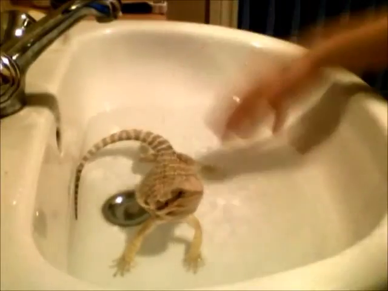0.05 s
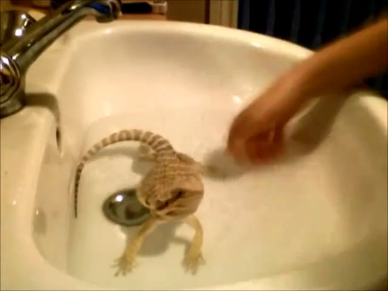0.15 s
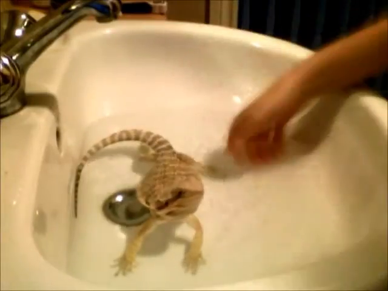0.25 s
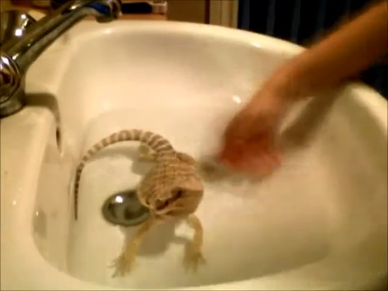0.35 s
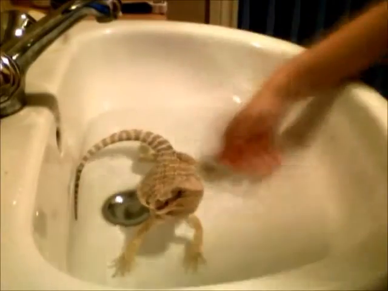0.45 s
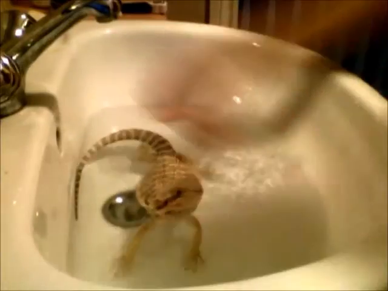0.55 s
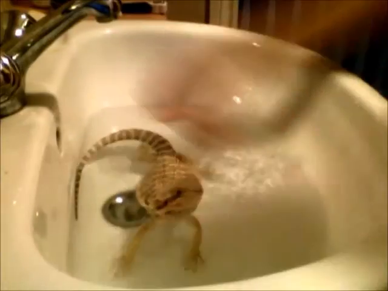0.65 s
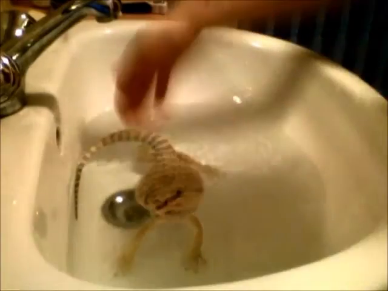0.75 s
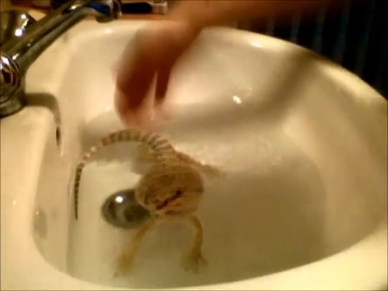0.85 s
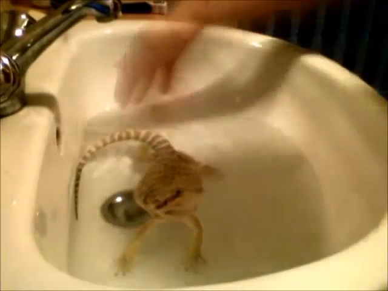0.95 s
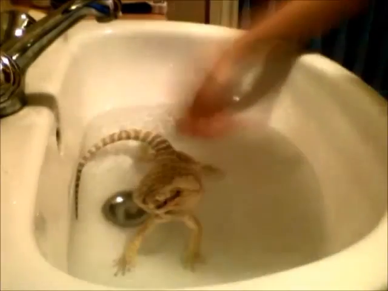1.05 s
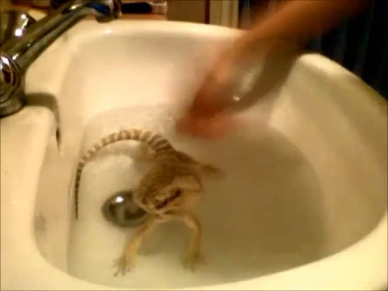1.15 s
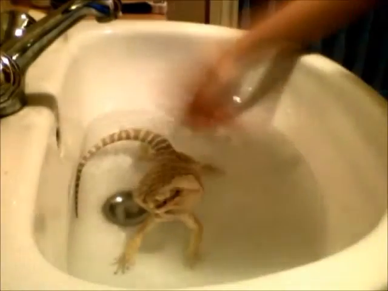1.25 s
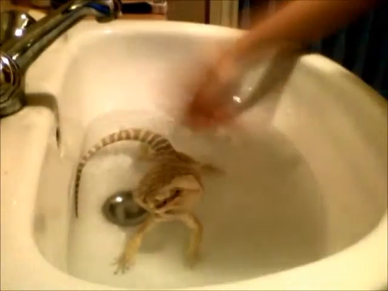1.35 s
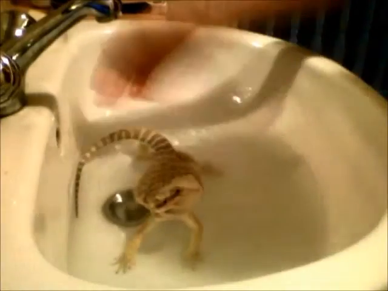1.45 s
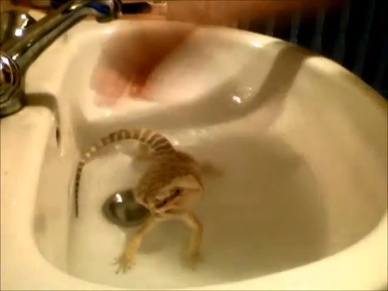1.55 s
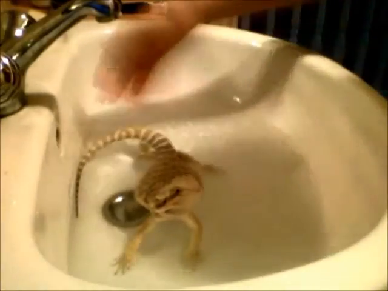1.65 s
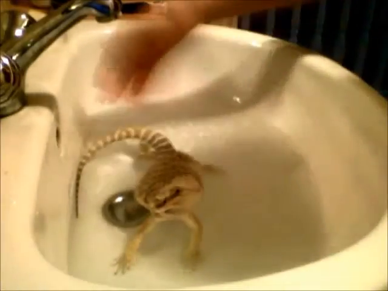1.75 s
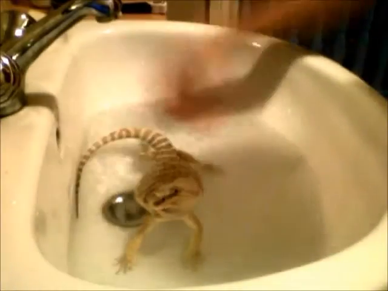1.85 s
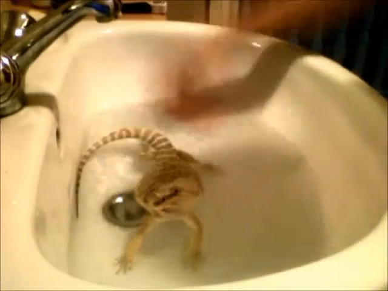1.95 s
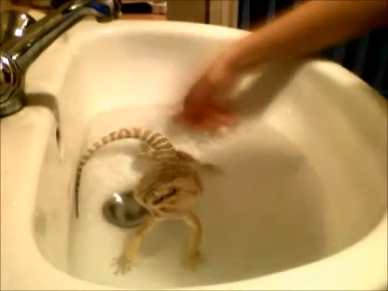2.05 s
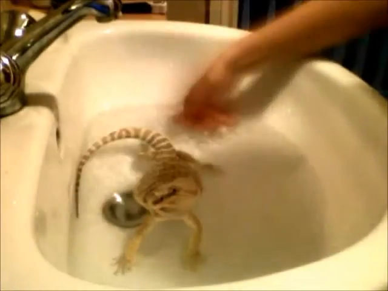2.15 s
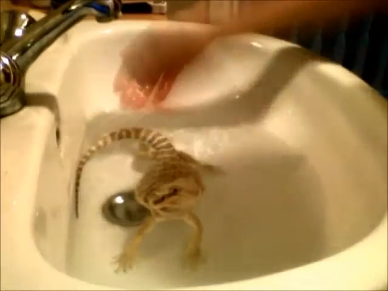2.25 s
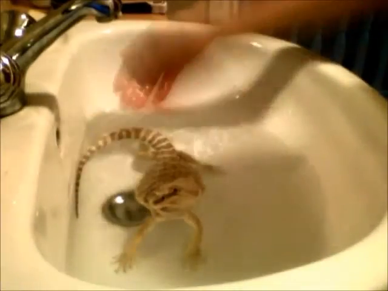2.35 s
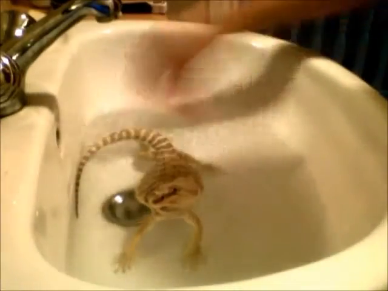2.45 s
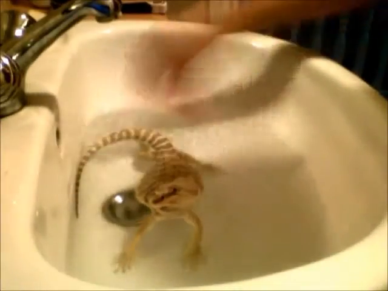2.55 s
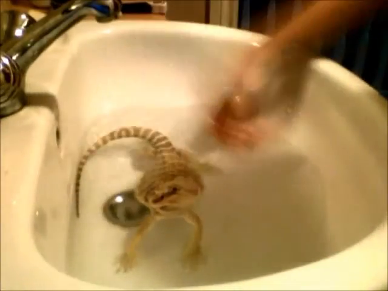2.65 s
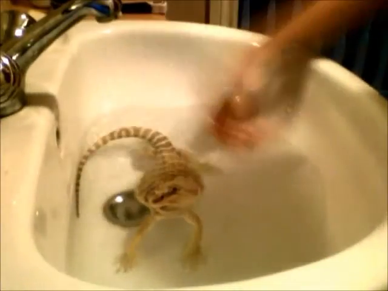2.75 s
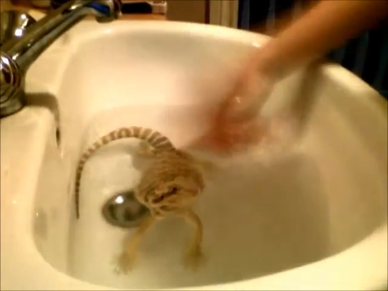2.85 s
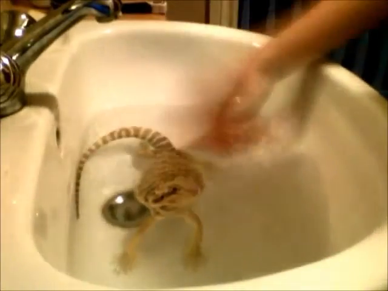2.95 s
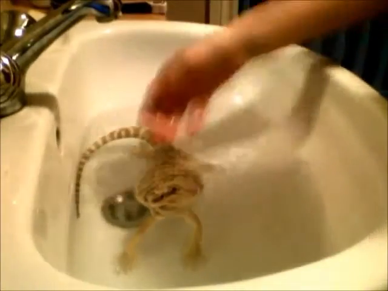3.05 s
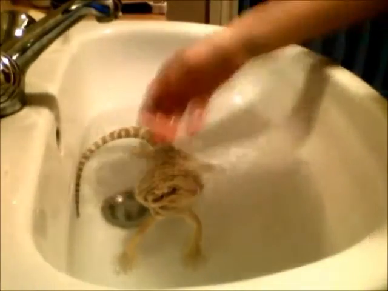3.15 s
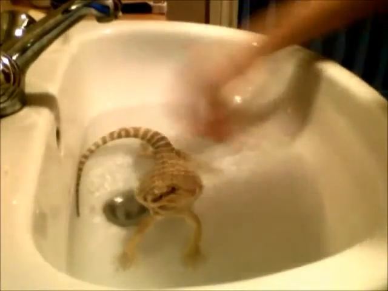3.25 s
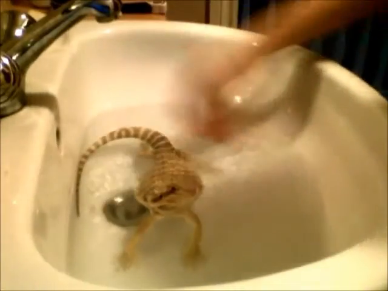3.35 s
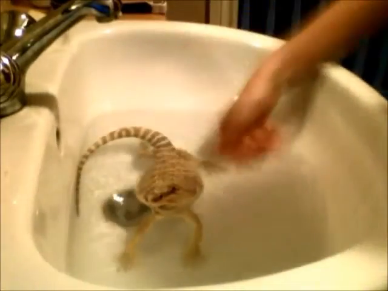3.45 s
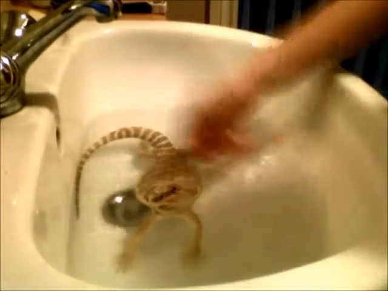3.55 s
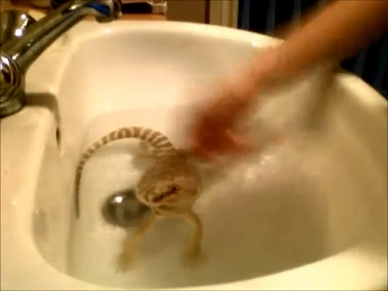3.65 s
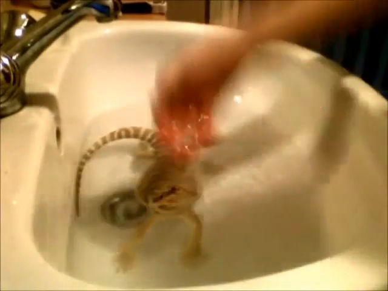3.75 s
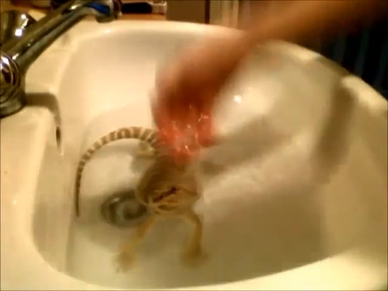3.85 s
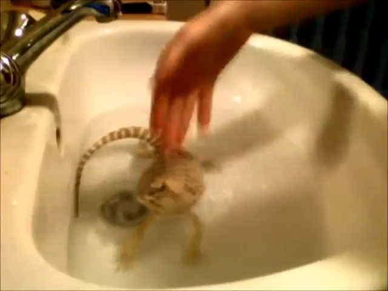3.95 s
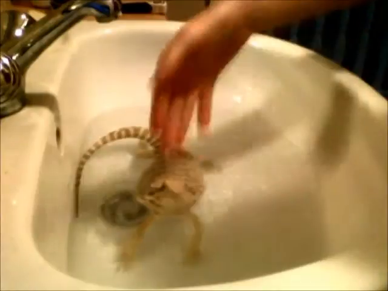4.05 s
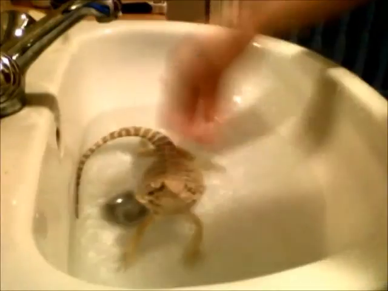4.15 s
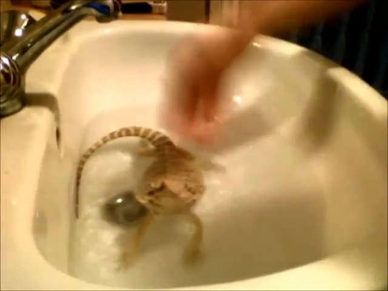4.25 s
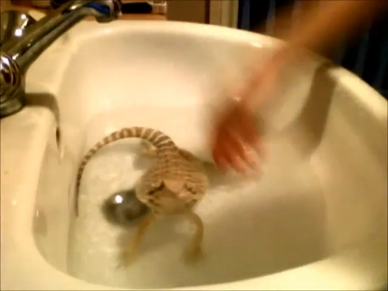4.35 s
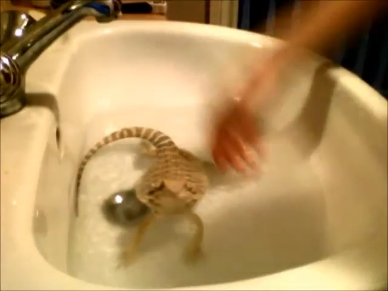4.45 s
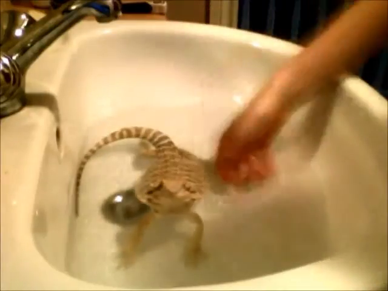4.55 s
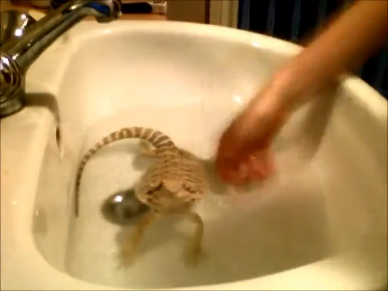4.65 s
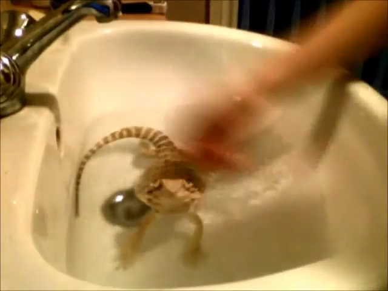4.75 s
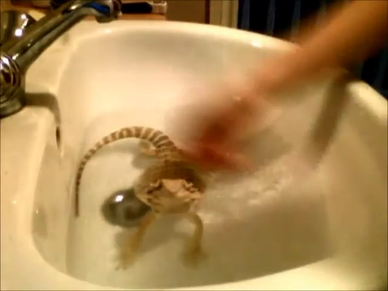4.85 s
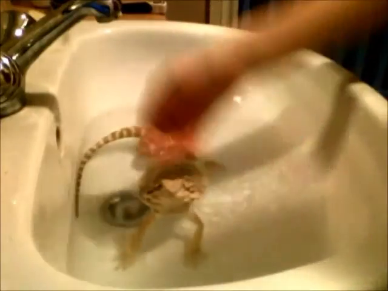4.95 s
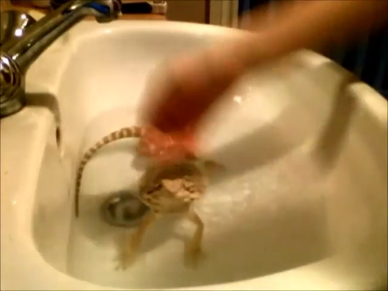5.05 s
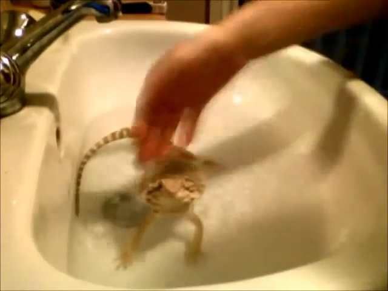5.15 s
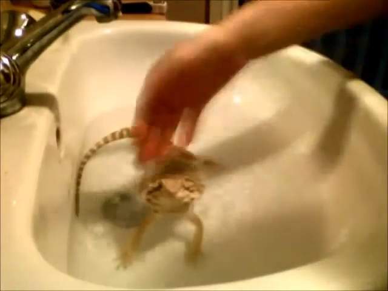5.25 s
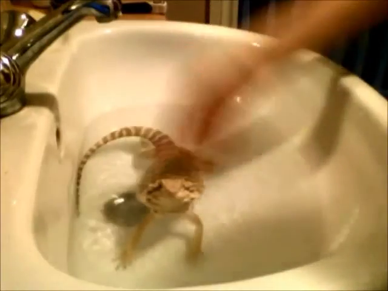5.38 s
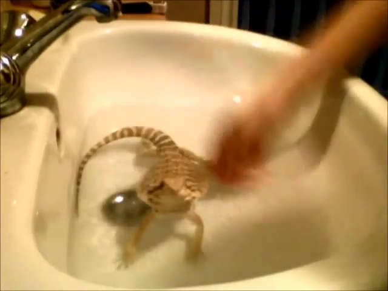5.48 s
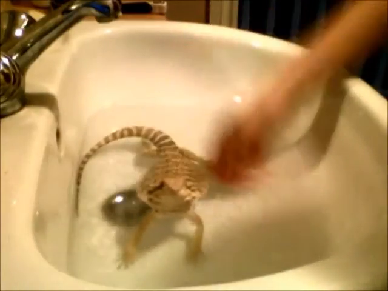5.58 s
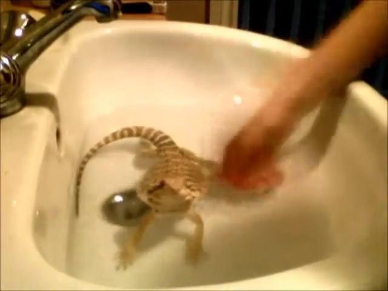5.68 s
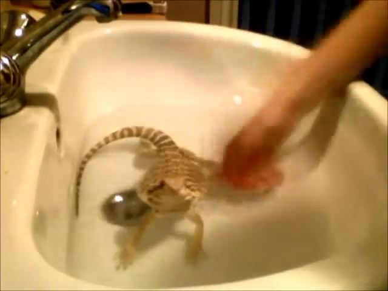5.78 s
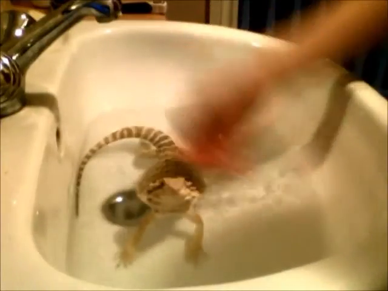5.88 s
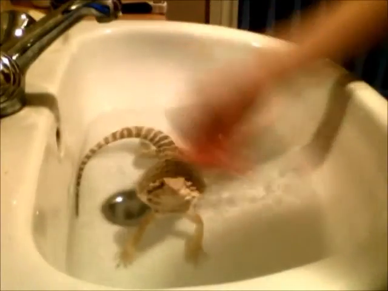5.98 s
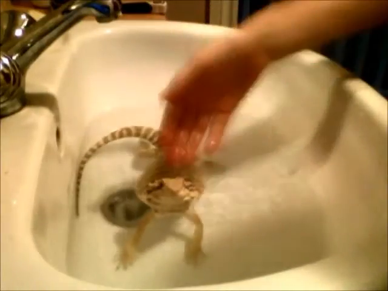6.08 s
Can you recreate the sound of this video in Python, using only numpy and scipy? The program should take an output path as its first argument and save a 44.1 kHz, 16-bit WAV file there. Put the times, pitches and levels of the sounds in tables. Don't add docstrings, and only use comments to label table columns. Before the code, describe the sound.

A constant mid-low fan drone with airy draught underlies everything. A muffled knock opens, followed by light drips and little water movements; a few low bumps come before two seconds, then a calmer stretch of plinks. A bright, loud drip leads into repeated deep thumps with short sloshes until the end. Close, lo-fi camera microphone on the counter, with short tiled-room reverberation and faint metallic high-frequency artifacts.

```python
import sys
import numpy as np
from scipy import signal
from scipy.fft import rfft, irfft, next_fast_len
from scipy.io import wavfile
from scipy.ndimage import uniform_filter1d

SR = 44100
rng = np.random.default_rng(int(sys.argv[2]) if len(sys.argv) > 2 else 0)


def persist_wave(psi):
    counts = np.round(np.clip(psi, -1, 1) * 32767).astype(np.int16)
    wavfile.write(sys.argv[1], SR, np.atleast_2d(counts).T)


def invert_db(x):
    u = np.asarray(x, float) / 20
    return 10 ** u


N = 269892

# t/s, f/Hz
FAN_SPEED = [(0.0, 535.9), (0.05, 533.2), (2.25, 530.6), (3.54, 535.3), (4.75, 535.2), (6.07, 529.6),
             (6.12, 526.7)]
# multiple of the shaft rate, level/dB
FAN_ORDERS = [(0.5, -10), (1, -13.5), (1.5, -19), (2, -16), (2.5, -18.5), (3, -7.5), (3.5, -17), (4, -2.5),
              (4.5, -38), (5, -37), (5.5, -32), (6, -11), (6.5, -28), (7, -15.5), (7.5, -28), (8, -12.5),
              (8.5, -22.5), (9, -6), (9.5, -37), (10, -15), (10.5, -26), (11, -24), (11.5, -28.5),
              (12, -26), (12.5, -25.5), (13, -20.5), (13.5, -30.5), (14, -31.5)]
# f/Hz, level/dB
MAINS_HUM = [(120, -49.5)]
# f/Hz, density/dB per Hz
DRAUGHT = [(15, -12.5), (45, -8), (72, -1), (105, -8), (150, -13), (220, -9.5), (330, -16.5), (700, -14),
           (1500, -16.5), (2300, -23), (2700, -25.5), (3200, -31.5), (4000, -41)]
# t/s, gain/dB
HAND_SWELLS = [(0.1, 4.5), (0.54, 3.5), (1.7, 5), (4.365, 8.5), (5.225, 7), (5.47, 7.5), (5.77, 9)]
# t/s, level/dB
LAPPING_LEVEL = [(0.0, -60.5), (0.83, -64.5), (1.21, -65.5), (1.7, -65), (3.83, -63.5), (4.33, -63.5),
                 (4.94, -61), (5.13, -67.5), (5.79, -61), (6.12, -62.5)]
# f/Hz, width/Hz, level/dB
BOWL_MODES = [(1700, 180, 0.0016), (2050, 190, 0.0031), (2650, 180, 0.0032)]
# f/Hz, t60/s
TILE_DECAY = [(200, 0.68), (2000, 0.58), (5000, 0.35)]
# f/Hz, width/Hz, level/dB
COUNTER_MODES = [(106.2, 24, -4), (146.5, 25.5, 4)]
# f/Hz, width/Hz, level/dB
CABINET_MODES = [(200.6, 16.9, -5), (273.4, 37.2, 1), (356.3, 36.8, -2), (431, 61, -1.5)]
# t/s, sway level/dB, drum level/dB, rattle level/dB, sway f/Hz
BLOW_EVENTS = [(0.043, -35, -17, -37, 39), (1.28, -20, -34.5, -47.5, 23.1), (1.856, -33, -36, -50, 27.3),
               (3.675, -24.5, -37, -43, 26.6), (4.184, -13, -13, -26, 56), (4.602, -18, -25.5, -35, 43.9),
               (5.096, -18, -16.5, -31, 24.8), (5.67, -12.5, -33, -41, 32.3)]
# t/s, sway level/dB, drum level/dB, rattle level/dB, sway f/Hz
REBOUND_EVENTS = [(0.075, -39, -33, -47.5, 36.2), (0.115, -35, -34, -50, 33.8),
                  (1.327, -30, -37, -58, 39.5), (1.345, -28.5, -46, -50, 36),
                  (1.398, -30.5, -43.5, -57, 40.4), (1.481, -38, -59, -56, 27),
                  (3.712, -29, -37.5, -58, 29.8), (3.751, -42, -45, -55, 37),
                  (4.215, -26.5, -23.5, -34, 42.4), (4.232, -11.5, -35, -45.5, 48),
                  (4.284, -22.5, -37, -53, 49), (4.432, -35.5, -53, -54, 29.1),
                  (4.644, -31, -30.5, -40, 24.3), (4.672, -20.5, -37, -41, 24.8),
                  (5.135, -24, -36, -34.5, 38.8), (5.18, -25.5, -28, -44.5, 29),
                  (5.228, -37.5, -42, -54, 40), (5.733, -26.5, -31, -36.5, 28),
                  (5.788, -24, -36, -42.5, 29.4), (5.859, -33, -42.5, -61, 21.6)]
# t/s, level/dB
BRUSH_EVENTS = [(0.6, -48), (0.791, -44.5), (1.115, -48), (1.262, -43), (5.07, -43), (1.818, -45.5),
                (2.1, -54.5), (2.399, -55), (2.669, -54), (3.269, -52), (4.35, -49)]
# t/s, peak level/dB, pitch f/Hz
DROP_EVENTS = [(0.17, -51.5, 1932), (3.15, -54, 2230), (0.496, -57.5, 3380), (0.559, -49, 1700),
               (0.693, -53, 2675), (0.699, -57.5, 3230), (0.74, -57.5, 3030), (0.54, -62, 3540),
               (0.918, -53.5, 1700), (1.2, -52.5, 2050), (2.075, -54.5, 2660), (3.882, -36.5, 1980),
               (2.321, -55.5, 2850), (2.74, -45.5, 2650), (2.949, -56, 2560), (3.146, -50.5, 2048),
               (3.881, -41.5, 2303), (3.881, -29, 1872), (4.931, -59.5, 2590), (4.976, -51, 2650),
               (5.011, -46.5, 2030), (5.061, -53.5, 2050), (5.163, -54, 1700), (5.349, -54.5, 2815),
               (5.665, -46, 2050), (5.689, -56.5, 3110), (5.69, -47, 2650), (5.735, -46, 2700),
               (5.744, -50, 2140), (5.96, -53.5, 1670)]
# t/s, level/dB, length/s, centre f/Hz
SLOSHES = [(0.683, -66, 0.042, 2890), (1.82, -59.5, 0.057, 600), (2.327, -60.5, .12, 300),
           (4.194, -52.5, 0.061, 534), (3.89, -68, 0.069, 913), (4.615, -58, 0.089, 520),
           (5.109, -53, 0.046, 405), (5.202, -63, .05, 960), (5.302, -68.5, 0.074, 2760),
           (5.669, -64, 0.16, 2400), (5.777, -55, .05, 705),
           (1.105, -52.5, .068, 450),
    (1.112, -54, .068, 1050),
    (5.662, -51, .05, 850),
    (5.725, -52, .1, 550),
    (5.67, -61, .12, 1600),
]
# f/Hz, level/dB
FOLD_IMAGE = [(3900, 0.5), (4650, -13.5), (5500, -42), (6100, -50.5), (7000, -50), (8000, -65), (9000, -81)]
# f/Hz, level/dB
MIRROR_CARRIERS = [(3900, -51), (7800, -65), (11700, -75.5), (11900, -82.5), (15600, -85.5), (15870, -83)]
# f/Hz, density/dB per Hz
CHANNEL_NOISE = [(300, -4), (900, -1), (2500, 0.5), (3500, -8), (4500, -20.5), (5200, -29.5)]
# f/Hz, gain
BASS_LEAN = [(200, -.03), (600, -.012)]


def unit(x):
    return x / np.sqrt(np.mean(x ** 2) + 1e-20)


def along(points, hz):
    f, v = np.transpose(points)
    return np.interp(np.log(hz + 1), np.log(f + 1), v)


def curve(points):
    s, v = np.transpose(points)
    return np.interp(np.arange(N) / SR, s, v)


def wobble(rate):
    return np.interp(np.arange(N) * rate / SR, np.arange(400), rng.standard_normal(400))


def filtered(x, response):
    n = x.shape[-1]
    m = next_fast_len(n + SR // 4)
    return irfft(rfft(x, m) * response(np.fft.rfftfreq(m, 1 / SR)), m)[..., :n]


def modes(table, top_hz):
    def response(f):
        total = 0
        for k, (centre, width, db) in enumerate(table):
            total = total + (-1) ** k * invert_db(db) * 1j * f / (centre * centre - f * f + 1j * f * width)
        return total / (1 + 1j * f / top_hz) ** 3
    return response


def sixth_db():
    t = np.arange(N) / SR
    swells = sum(db * np.exp(-((t - s) / 0.046) ** 2 / 2) for s, db in HAND_SWELLS)
    return -61 + 2.76 * wobble(11) + swells


def fan():
    shaft_phase = 2 * np.pi * np.cumsum(curve(FAN_SPEED) / 4) / SR
    drone, hum = np.zeros(N), np.zeros(N)
    for k, db in FAN_ORDERS:
        level = sixth_db() if k == 6 else db - 54.5 + wobble(8.3)
        phase = k * shaft_phase + rng.uniform(0, 6.55) + 0.15 * wobble(18)
        drone += np.sqrt(2) * invert_db(level) * np.sin(phase)
    for hz, db in MAINS_HUM:
        hum += np.sqrt(2) * invert_db(db + 0.1 * wobble(14)) * np.sin(2 * np.pi * hz * np.arange(N) / SR)

    z = signal.stft(rng.standard_normal(N), nperseg=512)[2]
    patches = uniform_filter1d(uniform_filter1d(rng.standard_normal(z.shape), 5, 0), 10, 1)
    gusts = signal.istft(z * invert_db(1.4 * unit(patches)), nperseg=512)[1][:N]
    draught = filtered(gusts, lambda hz: invert_db(along(DRAUGHT, hz)))

    tremble = filtered(rng.standard_normal(N), lambda hz: hz / (hz + 8) / (1 + (hz / 30) ** 3))
    tremble_db = -54.5 + 1.5 * wobble(1) + 3 * wobble(18)
    return drone + hum + invert_db(-57) * unit(draught) + invert_db(tremble_db) * unit(tremble)


def bubble(t, hz, cycles, rise):
    age = t * hz / cycles
    tone = np.sin(2 * np.pi * hz * t * (1 + rise * np.minimum(age, 2) / 2))
    return tone * np.exp(-age) * (1 - np.exp(-t * hz / 1.5)) ** 2


def tiled(x):
    hz, t, z = signal.stft(rng.standard_normal(SR // 2), SR, nperseg=256)
    early = 1 + 1.2 * np.exp(-(t / 0.041) ** 2)
    decay = invert_db(-60 * t / along(TILE_DECAY, hz)[:, None]) * early
    tail = signal.istft(z * decay, SR, nperseg=256)[1]
    delayed = np.pad(x, (250, 0))
    return signal.fftconvolve(delayed, tail / np.linalg.norm(tail))


def lapping(count=1200):
    draw = rng.standard_normal((count, 2))
    hz = 2100 * np.exp(.22 * np.clip(draw[:, :1], -2, 1.5))
    span = np.arange(900)
    grains = invert_db(4 * draw[:, 1:]) * bubble(span / SR, hz, 10, rise=.1)
    where = rng.integers(0, N, (count, 1)) + span
    ripples = np.bincount(where.ravel(), grains.ravel(), N + 900)[:N]
    near = filtered(ripples, modes(BOWL_MODES, top_hz=5000))
    return invert_db(curve(LAPPING_LEVEL) - 7) * unit(near + invert_db(4.5) * tiled(near)[:N])


def knocks():
    blows = [(*row, 0.032, hz) for *row, hz in BLOW_EVENTS]
    rebounds = [(*row, 0.022, hz) for *row, hz in REBOUND_EVENTS]
    brushes = [(s, db, db, db - 3.5, 0.028, 38) for s, db in BRUSH_EVENTS]
    return blows + rebounds + brushes


def thumps():
    out, t = np.zeros(N + SR), np.arange(SR // 4) / SR
    drum, rattle = modes(COUNTER_MODES, top_hz=300), modes(CABINET_MODES, top_hz=600)
    strength = np.array([[.02], [.04], [.09]])
    stretch = np.array([[1.8], [.9], [1.3]])
    for s, *peaks_db, length, sway_hz in knocks():
        shudder = np.exp(-t / (max(length, .004) * stretch))
        pushes = strength * rng.standard_normal((3, len(t))) * shudder
        pushes[[0, 1, 2], [SR // 250, 0, 0]] -= 1
        sway = modes([(.8 * sway_hz, 2.2 * sway_hz, 0)], top_hz=2.3 * sway_hz)
        bodies = [sway, lambda hz: drum(hz) ** 2, lambda hz: rattle(hz) ** 2]
        for push, body, db in zip(pushes, bodies, peaks_db):
            ring = filtered(push, body)
            out[round(s * SR):][:len(t)] += invert_db(db) * ring / np.abs(ring).max()
    return out[:N]


def drops():
    out, t = np.zeros(N + SR), np.arange(SR // 10) / SR
    for s, db, hz in DROP_EVENTS:
        cycles = max(11.9 - .1 * (db + 53.5), 3)
        plink = bubble(t, hz, 1.2 * cycles, rise=-.01)
        plink += .6 * bubble(t, 1.09 * hz, .8 * cycles, rise=-.02)
        wet = invert_db(0.5) * tiled(plink)
        wet[:len(t)] += plink
        start = round(s * SR)
        out[start:][:len(wet)] += invert_db(db - 0.9) * wet[:N + SR - start]
    return out[:N]


def swishes():
    out, t = np.zeros(N + SR), np.arange(SR // 3) / SR
    for s, db, length, centre_hz in SLOSHES:
        def band(hz):
            return np.exp(-(np.log((hz + 1) / centre_hz) / .65) ** 2) / (1 + (hz / 3300) ** 8)
        wash = filtered(rng.standard_normal(len(t)), band)
        swell = (1 - np.exp(-t / .008)) * np.exp(-(t / length) ** 4)
        out[round(s * SR):][:len(t)] += invert_db(db) * unit(wash) * swell
    return out[:N] * invert_db(1.2 * wobble(60))


def scene():
    mono = fan() + lapping() + thumps() + drops() + swishes()
    return np.array([mono, mono])


def low_pass(x):
    return signal.sosfilt(signal.butter(12, 15900, fs=SR, output="sos"), x)


def record(dry):
    t, first_rate_hz = np.arange(N) / SR, 8000
    narrow = filtered(dry[0], lambda hz: hz < first_rate_hz / 2)
    mirrored = 2 * narrow * np.cos(2 * np.pi * first_rate_hz * t)
    fold = filtered(mirrored, lambda hz: invert_db(along(FOLD_IMAGE, hz)))
    carriers = sum(invert_db(db) * np.cos(2 * np.pi * hz * t) for hz, db in MIRROR_CARRIERS)
    mid = narrow + fold + filtered(narrow * carriers, lambda hz: hz > 2500)

    lean = filtered(mid, lambda hz: along(BASS_LEAN, hz))
    apart = filtered(rng.standard_normal(N), lambda hz: invert_db(along(CHANNEL_NOISE, hz)))
    side = lean + invert_db(-83) * unit(apart)
    hiss = invert_db(-99) * filtered(rng.standard_normal((2, N)), lambda hz: hz > 6800)
    return low_pass(np.array([mid + side, mid - side]) + hiss)


dry = scene()
out = record(dry)
persist_wave(out)
```